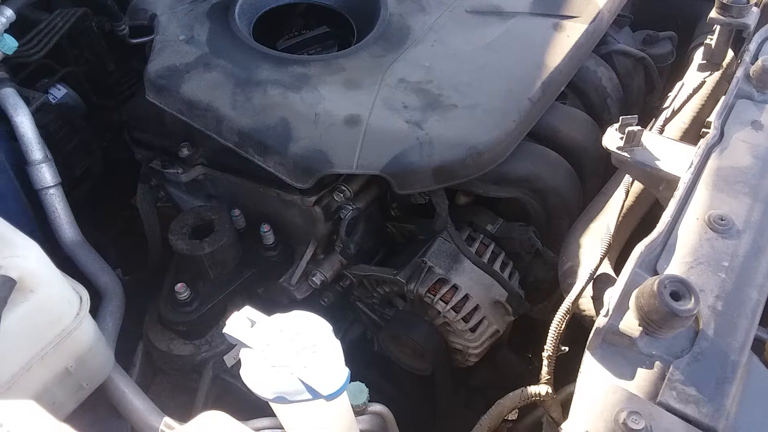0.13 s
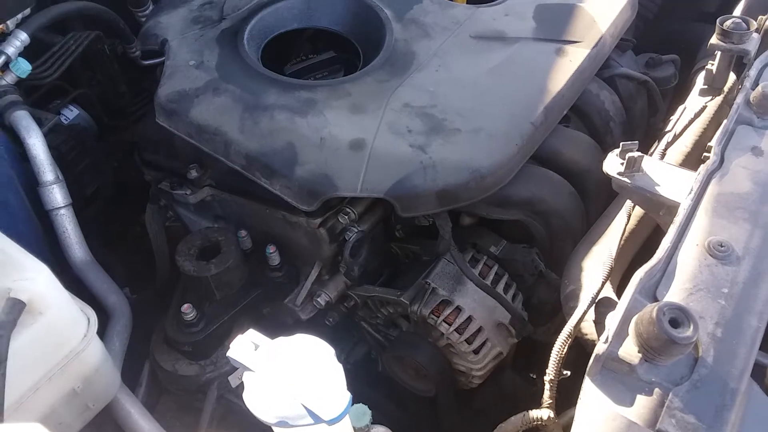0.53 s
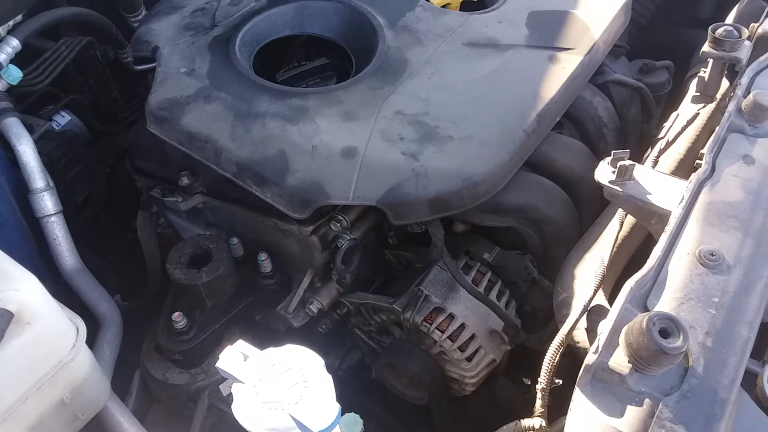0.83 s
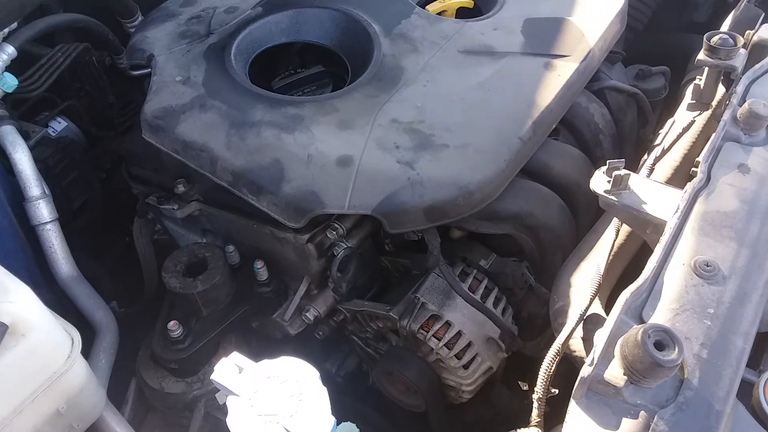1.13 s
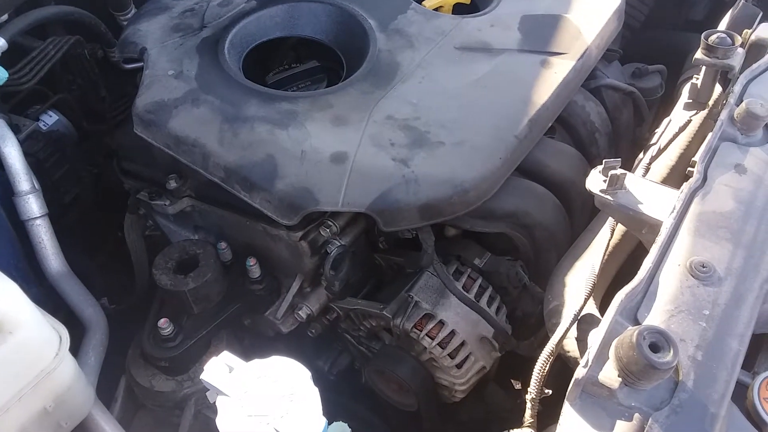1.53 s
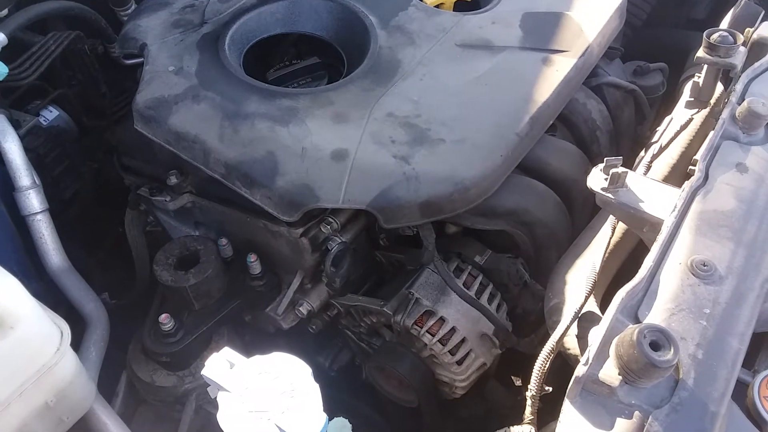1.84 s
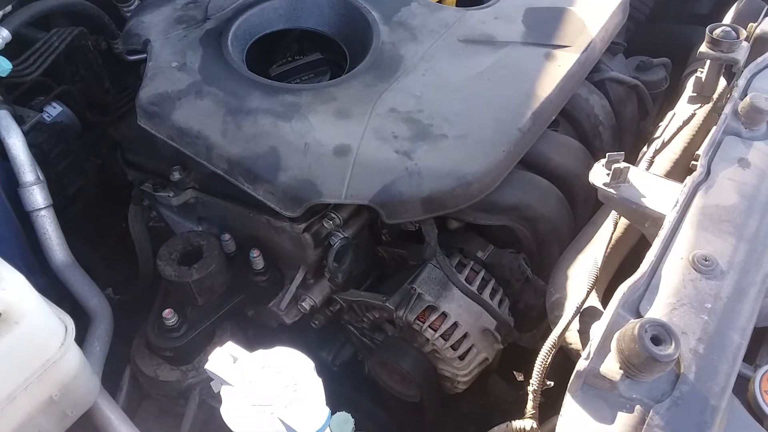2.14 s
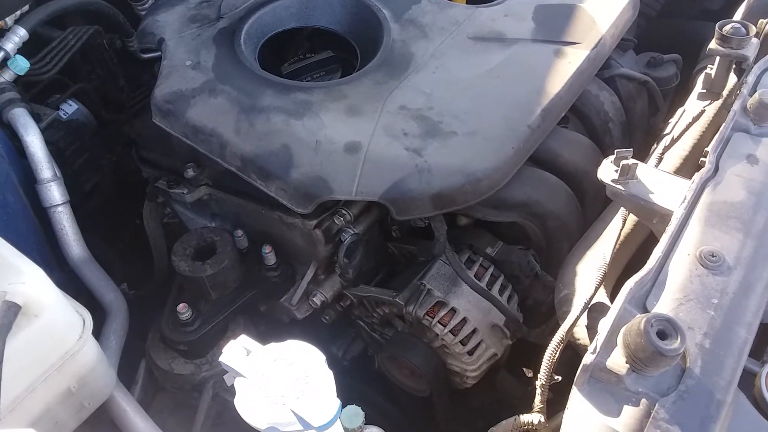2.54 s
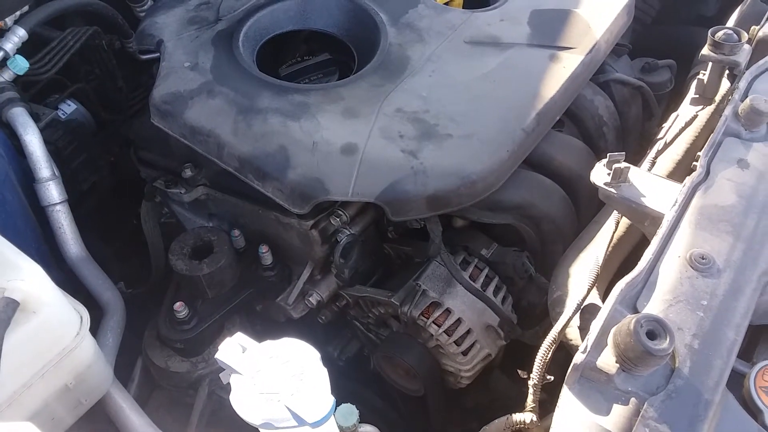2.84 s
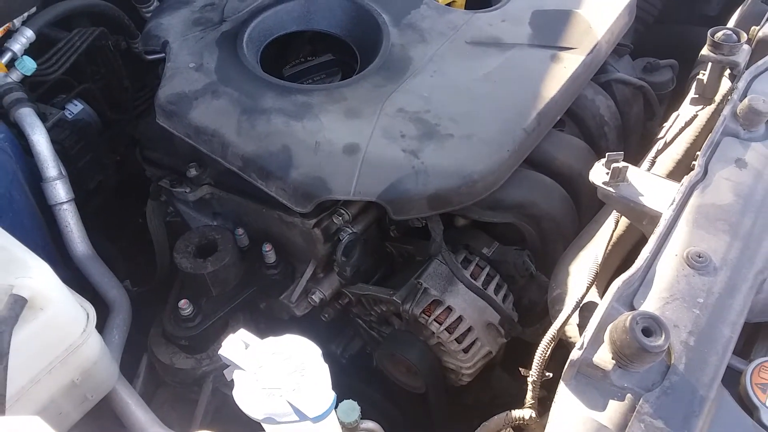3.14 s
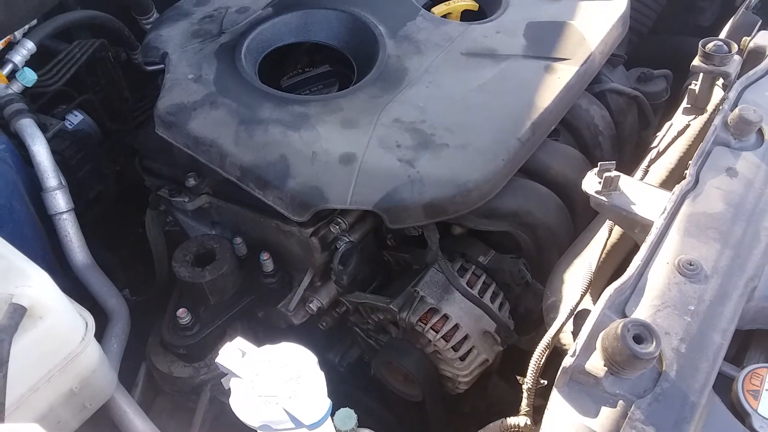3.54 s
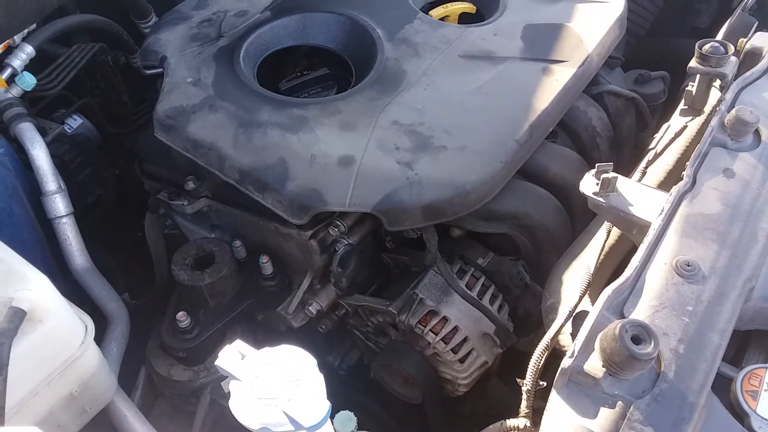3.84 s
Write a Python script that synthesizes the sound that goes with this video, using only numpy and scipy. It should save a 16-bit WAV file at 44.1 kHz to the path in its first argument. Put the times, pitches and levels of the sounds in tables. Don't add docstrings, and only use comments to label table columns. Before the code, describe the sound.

Silence until about 0.4 s, then a fast-idling car engine fades in, reaching full level by 0.7 s. Dull, hard knocks and sharp metallic ticks clatter unevenly, roughly 33 firings a second, over a droning hum and throbbing belt and fan noise. Low thumps fall near 0.6, 0.75 and faintly 0.9 and 1.8 s. The idle continues steadily to the end, close, in stereo, with short bonnet reflections.

```python
import sys
import numpy as np
from scipy import signal
from scipy.fft import rfft, irfft
from scipy.io import wavfile

SR = 44100
rng = np.random.default_rng(int(sys.argv[2]) if len(sys.argv) > 2 else 0)


def transcribe(signal):
    frames = np.atleast_2d(signal).T
    limited = np.clip(frames, -1, 1)
    pcm = np.round(limited * 32767).astype(np.int16)
    wavfile.write(sys.argv[1], SR, pcm)


def attenuation_scalar(level_db):
    decades = np.asarray(level_db, float) / 20
    return 10 ** decades


N = 176400
T = np.arange(N) / SR
HZ = np.fft.rfftfreq(N, 1 / SR)
HALVES = np.array([[.5], [-.5]])

# time in seconds, firings so far.
CRANK = [(0.3676, 0), (0.8073, 14), (1.2414, 28), (1.6716, 42), (2.0991, 56), (2.524, 70), (2.946, 84),
         (3.3656, 98), (3.7247, 110), (4.1443, 124)]
# frequency in Hz, left over right in dB.
PORT_LEAN = [(60, -4), (180, 0), (550, -3.5), (1300, 7), (4970, -5.5), (6200, -1.5), (7600, 6), (15000, 10)]


def knocks():
    # frequency in Hz, level in dB, left over right in dB.
    block_modes = [(987.8, -3.5, 8), (1301.5, -4.5, -1), (1385.6, -11.5, 6), (1659, -4.5, 14),
                   (1693.3, 1.5, -4.5), (1791, -6, 4.5), (2080.8, 7.5, 3), (2236, -4.5, 15),
                   (2295, -2.5, -2), (2449, -4, 12.5), (2699, 1, 9), (2930.8, 9.5, -4), (3015.2, 0, 15.5),
                   (3257.4, -13.5, -26)]
    # frequency in Hz, level in dB per Hz.
    knock_tail = [(600, -22.5), (1200, -0.5), (2100, -7), (3200, -6), (3700, -5.5), (4600, -27),
                  (7000, -89.5), (15000, -51.5)]
    knock_course = {"late_s": 0.001289, "rise_s": 0.00159, "right_s": 0.0011278, "ring_db": 6, "crack_db":
                    16, "top_db": -40.5, "tail_db": 1.5, "crack_s": 0.000797}
    # one engine cycle, the level of each of four cylinders in dB.
    knock_levels = [(-27, -20.5, -28.5, -31), (-27, -22.5, -25, -20), (-26.5, -18, -26, -20.5),
                    (-28, -16.5, -25.5, -20.5), (-25, -15.5, -39.5, -21), (-23, -16, -43, -18.5),
                    (-22.5, -20, -21.5, -19.5), (-21.5, -34, -38, -21), (-28.5, -15, -24, -20),
                    (-23.5, -49.5, -24, -17), (-28.5, -26, -23.5, -17.5), (-43, -20.5, -27, -16.5),
                    (-28, -24.5, -27, -18), (-30.5, -22.5, -28, -22.5), (-21.5, -27, -26.5, -16.5),
                    (-30.5, -49, -23.5, -21.5), (-40, -47.5, -24, -19), (-39.5, -23.5, -22.5, -17.5),
                    (-29, -22, -23.5, -16), (-23, -20, -38, -16.5), (-30.5, -32, -33, -22),
                    (-31.5, -19, -31, -20), (-23, -21, -23.5, -20.5), (-23, -22.5, -27, -23),
                    (-23, -17, -51.5, -19), (-49.5, -16.5, -28.5, -20), (-22.5, -21.5, -50.5, -21),
                    (-27, -16.5, -51.5, -23), (-26, -18, -48.5, -26), (-23, -17.5, -34, -20)]
    return blows(knock_levels, block_modes, knock_tail, **knock_course)


def ticks():
    # frequency in Hz, level in dB, left over right in dB.
    cover_modes = [(987.6, -5.5, 3), (1125.5, -11.5, 7.5), (1388, -2, -3.5), (1552, -2, -11.5),
                   (1652, -3, 20), (1691.3, -2.5, 18.5), (1859, -41, -18), (2110, -21, -16),
                   (2162, -4, 12.5), (2572, -4.5, 15.5), (2768, -29.5, 6), (3777, -13, -18.5),
                   (4055, -19, -20.5), (5203, -14.5, -16.5)]
    # frequency in Hz, level in dB, left over right in dB.
    tappet_modes = [(6334, -17.5, -2), (6335, -11, 8), (6914, -6, 15.5), (6586, -14.5, 8.5),
                    (7113, -20.5, 11.5), (7350, -28.5, 12), (7470, -12.5, 18.5), (8000, -16.5, 21),
                    (8220, -13, 6.5)]
    # frequency in Hz, level in dB per Hz.
    tick_tail = [(600, -15), (1100, -0.5), (2000, 3.5), (3000, -22), (4500, -16.5), (7500, -12),
                 (8600, -25), (15000, -20)]
    tick_course = {"late_s": 0.0009047, "rise_s": 0.0008924, "right_s": 0.0011184, "ring_db": 14,
                   "crack_db": 23.5, "top_db": 5, "tail_db": 12.5, "crack_s": 0.000907}
    # one engine cycle, the level of each of four cylinders in dB.
    tick_levels = [(-47, -38.5, -28, -64.5), (-26, -44, -30.5, -55), (-24, -54.5, -39, -41),
                   (-23, -51.5, -29.5, -50), (-25.5, -52, -27.5, -50), (-28.5, -57, -28, -46.5),
                   (-25, -37, -29.5, -56), (-27, -29, -33, -51.5), (-25.5, -54.5, -37.5, -46),
                   (-26.5, -28.5, -30.5, -56), (-39.5, -52, -27.5, -49), (-50, -51.5, -23.5, -48.5),
                   (-36.5, -42.5, -25, -38.5), (-59.5, -55.5, -27, -29.5), (-31.5, -44.5, -26, -48.5),
                   (-52, -51.5, -26.5, -28), (-31, -46.5, -26.5, -57.5), (-66, -56.5, -26, -62.5),
                   (-46.5, -53.5, -29, -51.5), (-34, -57, -26, -41), (-45.5, -57.5, -26.5, -27),
                   (-27.5, -28, -33.5, -57.5), (-31.5, -55.5, -27, -41), (-28, -47, -28, -41.5),
                   (-27.5, -45, -50.5, -56), (-24.5, -33, -43, -59.5), (-28.5, -31, -51, -63.5),
                   (-25, -35, -51, -37), (-26.5, -34.5, -54, -52.5), (-25.5, -31.5, -59, -61.5)]
    return blows(tick_levels, cover_modes + tappet_modes, tick_tail, **tick_course)


def blows(levels_db, modes, tail, late_s, rise_s, right_s, ring_db, crack_db, top_db, tail_db, crack_s):
    contact_delays = [0.0, 0.001227, 0.0026354]
    # frequency in Hz, level in dB per Hz.
    snap_colour = [(3000, -22.5), (4500, -4.5), (7500, 2.5), (9000, -7), (15000, -11)]
    blow_spread, contact_spread = .2, .15
    slow_below_hz = 5600
    snap_s, tail_t60_s = 0.00099, .075
    crack_hz, crack_t60_s = 2150, .012

    force = attenuation_scalar(np.ravel(levels_db))
    seconds, firings = np.transpose(CRANK)
    start = np.interp(np.arange(len(force)), firings, seconds) + late_s
    chance = rng.standard_normal((len(start), 3, len(modes) + 1))
    contacts = []
    for k, delay in enumerate(contact_delays):
        moment = start + delay * (1 + contact_spread * chance[:, k, -1])
        contacts.append(np.minimum(moment * SR, N - 1).astype(int))

    rung = np.zeros((2, N))
    for m, (hz, db, pan_db) in enumerate(modes):
        clicks = np.zeros(N)
        for k, at in enumerate(contacts):
            habit = (-1) ** m if k == 0 else 0
            clicks[at] += force * (habit + blow_spread * chance[:, k, m])
        slow = hz < slow_below_hz
        if slow:
            clicks = swell(clicks, hz, rise_s)
        tone = ring(clicks, hz, .08 * (2000 / hz) ** .5)
        ports = np.array([tone, later(tone, right_s * slow)])
        rung += ports * attenuation_scalar(db + ring_db - 8.5 + pan_db * HALVES)
    rung = rung + echoes(rung)

    hit = np.zeros(N)
    hit[contacts[0]] = force
    twice = hit.copy()
    twice[contacts[2]] += force * (0.994 + blow_spread * chance[:, 2, 0])
    core = ring(swell(twice, crack_hz, crack_s), crack_hz, crack_t60_s)
    crack = attenuation_scalar(crack_db) * later(core, rise_s / 2)

    since = np.arange(N) - np.maximum.accumulate(np.arange(N) * (hit > 0))
    snap = attenuation_scalar(top_db) * coloured(pulse(hit, snap_s), snap_colour, since)
    onset = pulse(hit, rise_s) / (np.e * rise_s * SR)
    dying = signal.lfilter([1], [1, -attenuation_scalar(-60 / (tail_t60_s * SR))], onset)
    patchy = attenuation_scalar(2.56 * drift(84))
    return rung + crack + snap + attenuation_scalar(tail_db) * coloured(dying * patchy, tail, since)


def echoes(rung):
    # left delay in seconds, right delay in seconds, level in dB.
    bounces = [
        (.0098, 0.012, -10),
        (0.0175, 0.015, -10.5),
    ]
    total = 0
    for left_s, right_s, db in bounces:
        total = total + attenuation_scalar(db) * np.array([later(rung[0], left_s), -later(rung[1], right_s)])
    return total


def turns():
    seconds, firings = np.transpose(CRANK)
    middle = (seconds[1:] + seconds[:-1]) / 2
    firing_hz = np.diff(firings) / np.diff(seconds)
    return 2 * np.cumsum(np.interp(T, middle, firing_hz)) / SR


def drone():
    # multiple of twice the firing rate, level in dB.
    partials = [(1, -41.5), (1.75, -47.5), (2, -47.5), (2.4, -49), (3, -44), (4, -48), (5, -34.5),
                (7.75, -41.5), (8, -41.5), (10, -40.5), (20, -61)]
    waver_db, waver_rad, swell_db_per_s = .5, .17, .8
    port_waver_rad = .25
    out, phase = 0, 2 * np.pi * turns()
    for k, db in partials:
        root = np.sqrt(k)
        angle = k * phase + rng.uniform(0, 2 * np.pi) + waver_rad * root * drift(13.1)
        apart = port_waver_rad / root * drift(8.2) * np.array([[1], [-1]])
        tone = np.sqrt(2) * np.sin(angle + apart)
        trend = int(k > 4) - int(k == 4)
        change_db = root * (waver_db * drift(11.2) + trend * swell_db_per_s * (T - 2.5))
        out = out + tone * attenuation_scalar(db + change_db + at_hz(PORT_LEAN, 66 * k) * HALVES)
    return out


def clatter():
    # frequency in Hz, level in dB per Hz.
    wash_colour = [(60, -28.5), (230, -18), (330, -7), (880, -8.5), (2140, -2), (5650, -18.5),
                   (9500, -28.5), (15700, -23.5)]
    # frequency in Hz, bandwidth in Hz, level in dB.
    resonances = [(545.8, 40, -9), (1710, 480, -3), (2277, 236, -10.5)]
    wash_db, patchy_db, throb_depth = -23, 1.5, 0.383
    contacts_per_s, rattle_db = 900, -32.5
    throb = 1 + throb_depth * np.sin(2 * np.pi * turns())
    wash = coloured(throb * attenuation_scalar(patchy_db * drift(17.6)), wash_colour)
    born = (rng.random((2, N)) < contacts_per_s / SR) * rng.standard_normal((2, N))
    born = born * attenuation_scalar(4.55 * rng.exponential(1, (2, N)).clip(0, 4))
    born = born + 5.3 * born.sum(axis=0)
    rattle = 0
    for hz, bandwidth, db in resonances:
        rattle = rattle + attenuation_scalar(db) * rms_one(ring(born, hz, 2.72 / bandwidth))
    return attenuation_scalar(wash_db) * wash + attenuation_scalar(rattle_db) * rattle * attenuation_scalar([[1.5], [-1.5]])


def thumps():
    # time in seconds, level in dB.
    jolts = [
        (0.624, -14),
        (0.746, -14),
        (.872, -23),
        (1.80, -21.5),
    ]
    clicks = np.zeros(N)
    for s, db in jolts:
        clicks[int(s * SR)] = attenuation_scalar(db)
    push = signal.lfilter([.012], [1, -.99], clicks)
    return ring(push, 89, 0.0305)


def coloured(envelope, spectrum, since=None):
    # frequency in Hz, coherence from 0 to 1.
    likeness = [(60, 1), (300, 0.777), (600, 0.738), (1100, 0.133), (2200, 0.364), (5000, 0.101),
                (12000, .1)]
    sameness = .68
    white = rng.standard_normal((2, N))
    if since is not None:
        white = sameness * white[:, since] + np.sqrt(1 - sameness ** 2) * white[:, ::-1]
    mid, side = rfft(white * envelope)
    alike = np.clip(at_hz(likeness, HZ), 0, 1)
    gain = rms_one(attenuation_scalar(at_hz(spectrum, HZ)))
    lean = attenuation_scalar(at_hz(PORT_LEAN, HZ) * HALVES)
    pair = (np.sqrt(1 + alike) * mid + np.sqrt(1 - alike) * side * [[1], [-1]]) / np.sqrt(2)
    return irfft(pair * gain * lean, N)


def ring(x, hz, t60):
    r, w = attenuation_scalar(-60 / (t60 * SR)), 2 * np.pi * hz / SR
    return signal.lfilter([0, np.sin(w)], [1, -2 * r * np.cos(w), r * r], x + 1e-18)


def swell(x, hz, s):
    r, w = np.exp(-1 / (s * SR)), 2 * np.pi * hz / SR
    return signal.lfilter([1 - r, 0, r - 1], [1, -2 * r * np.cos(w), r * r], x + 1e-18)


def pulse(hit, s):
    q = np.exp(-1 / (s * SR))
    return signal.lfilter([np.e * (1 - q)], [1, -2 * q, q * q], hit + 1e-18)


def later(x, s):
    return np.roll(x, int(s * SR), axis=-1)


def drift(rate):
    r = np.exp(-80 * np.pi * rate / SR)
    slow = signal.lfilter([1], [1, -2 * r, r * r], rng.standard_normal(N // 40 + 2002))[2000:]
    return np.interp(np.arange(N) / 40, np.arange(len(slow)), rms_one(slow))


def at_hz(points, hz):
    table_hz, value = np.transpose(points)
    return np.interp(np.log(hz + 1), np.log(table_hz), value)


def rms_one(x):
    return x / np.sqrt(np.mean(x ** 2) + 1e-20)


def scene():
    # frequency in Hz, delay in samples.
    right_lag = [(300, 2.6), (800, 8.7), (1800, 19.264)]
    left, right = knocks() + ticks() + drone() + clatter() + thumps()
    turn_back = np.exp(-2j * np.pi * HZ * at_hz(right_lag, HZ) / SR)
    return np.array([left, irfft(rfft(right) * turn_back, N)])


def band_limit(x):
    return signal.sosfilt(signal.butter(12, 15890, fs=SR, output="sos"), x)


def record(dry):
    fade_start_s, fade_s, onset_s = 0.4015, 0.292, 0.017
    since_start = T - fade_start_s
    fade = np.clip(since_start / fade_s, 0, 1) * np.clip(since_start / onset_s, 0, 1)
    bass_cut = signal.butter(2, 55.6, "high", fs=SR, output="sos")
    x = signal.sosfilt(bass_cut, dry) * fade
    x = 1.12 * np.tanh(x / 1.12)
    top_cut = signal.ellip(12, .5, 60, 16000, fs=SR, output="sos")
    return band_limit(signal.sosfilt(top_cut, x))


dry = scene()
out = record(dry)
transcribe(out)
```